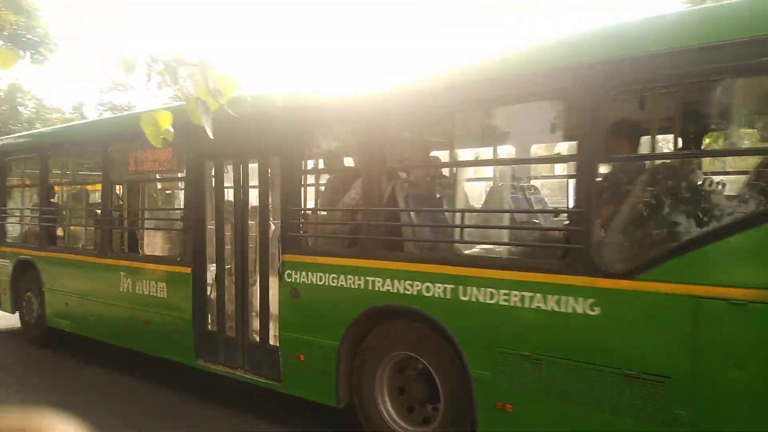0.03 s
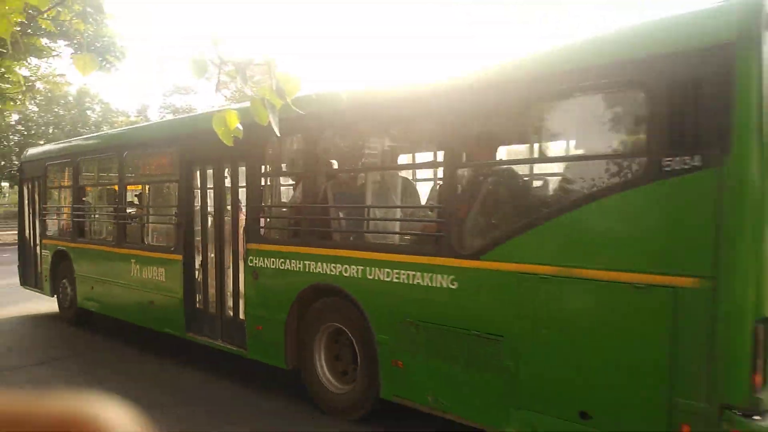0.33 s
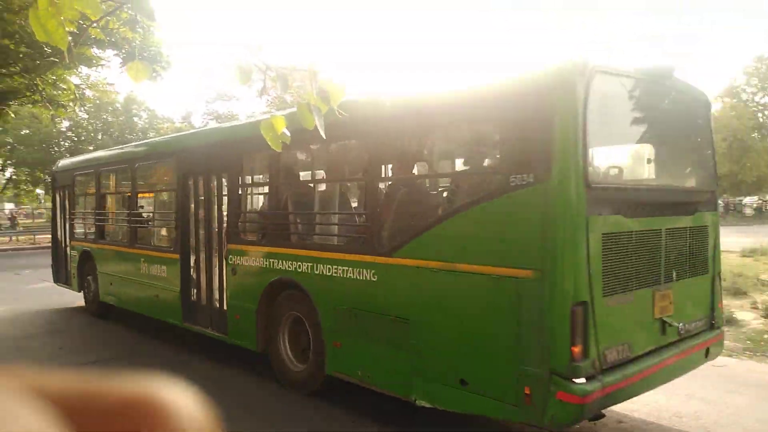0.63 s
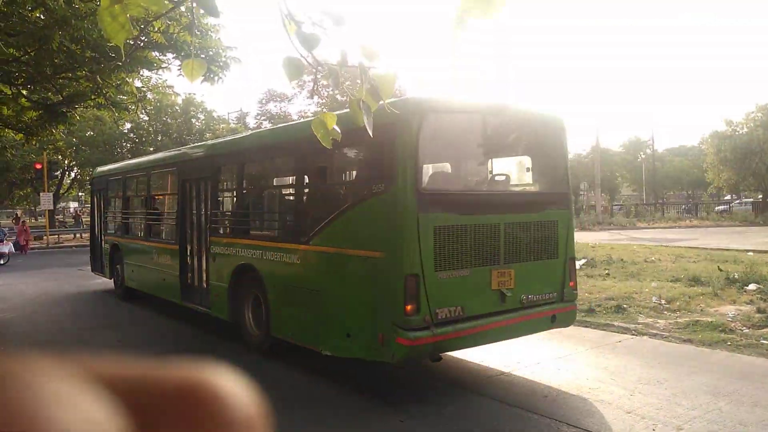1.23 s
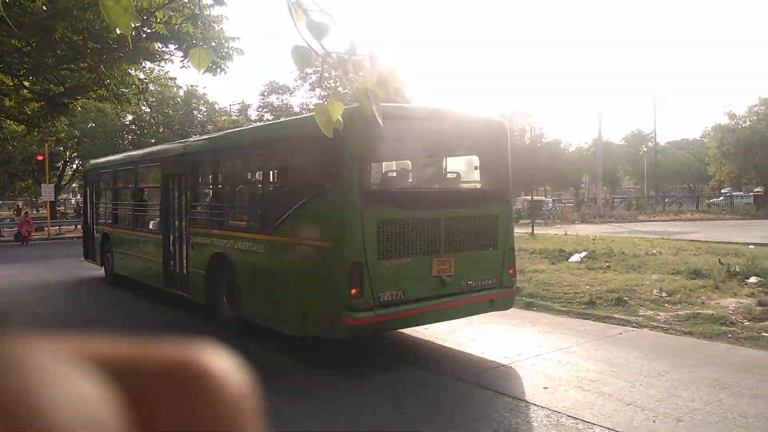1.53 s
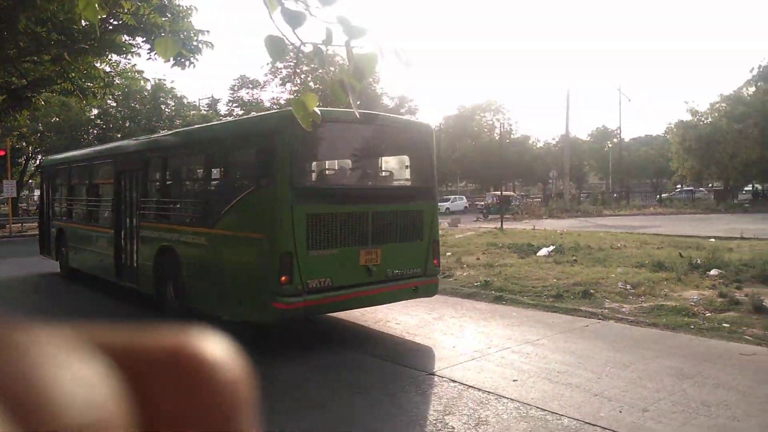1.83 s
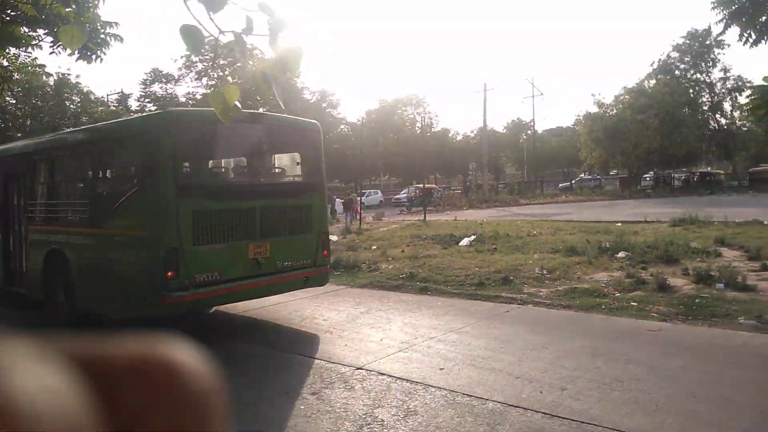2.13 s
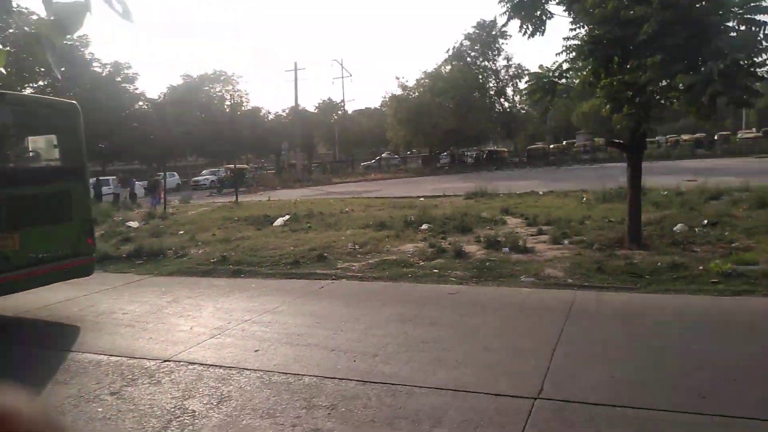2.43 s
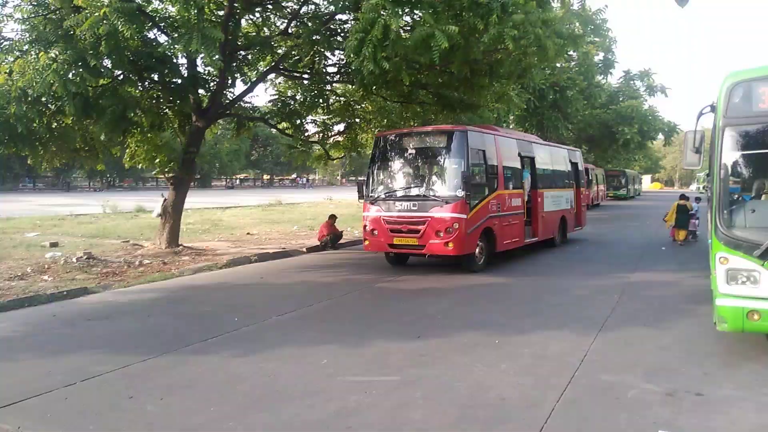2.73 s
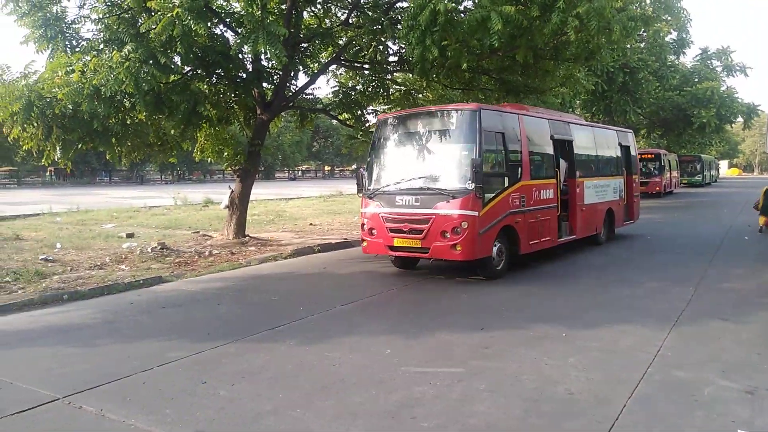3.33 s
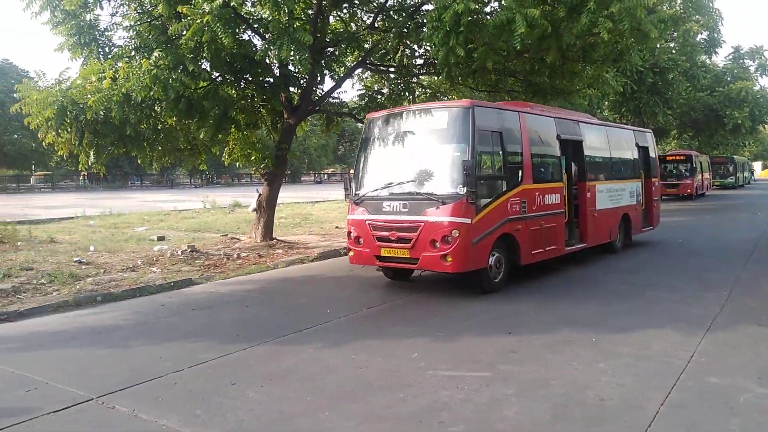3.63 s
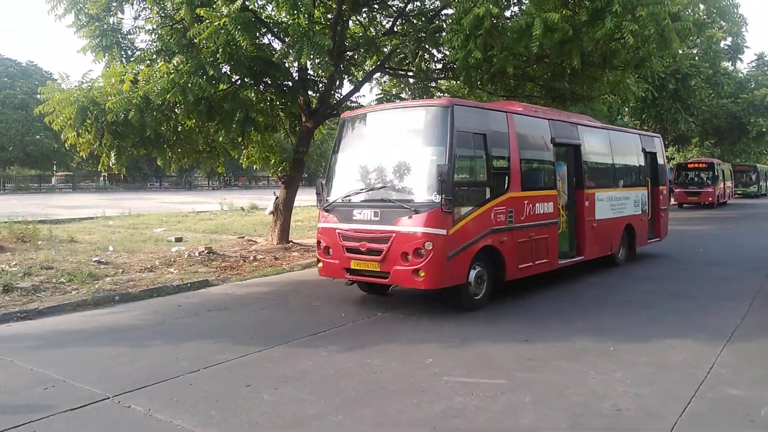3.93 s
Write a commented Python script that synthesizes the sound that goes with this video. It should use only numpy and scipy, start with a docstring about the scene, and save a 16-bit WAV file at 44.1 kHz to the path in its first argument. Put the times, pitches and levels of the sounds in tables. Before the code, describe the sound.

Diesel bus rumble on a road, heard close in wide stereo. The first bus slows past with high brake squeaks, puffs of air and a whining rear engine, cuts out briefly, and another approaches droning in low gear.

```python
"""A thin brake squeal rides on the rumble of a diesel bus slowing past at arm's length. The brake valve
spits air, a loose panel clacks, and the rear engine swings into view, whining and ringing its bay.
After a tenth of a second of silence a second bus approaches in low gear: exhaust and gears drone, and
each cylinder firing knocks the block. Both are heard through a close microphone pair with a stereo
widener."""
import sys
import numpy as np
from scipy import signal
from scipy.fft import rfft, irfft
from scipy.io import wavfile
from scipy.ndimage import uniform_filter1d

SR = 44100
rng = np.random.default_rng(int(sys.argv[2]) if len(sys.argv) > 2 else 0)


def file_out(sig):
    """Save sig as 16-bit WAV at sys.argv[1]."""
    # one column per channel
    cols = np.atleast_2d(sig).T
    # limit, then scale
    lim = np.clip(cols, -1, 1)
    pcm = np.round(lim * 32767).astype(np.int16)
    wavfile.write(sys.argv[1], SR, pcm)


N = 176400
T, HZ = np.arange(N) / SR, np.fft.rfftfreq(N, 1 / SR)

# Engine and road faders of each bus: t/s, low level/dB, middle level/dB, treble level/dB
LEAVING_LEVELS = [(0, -30, -29, -31.5), (.12, -34, -32.5, -32), (0.301, -34.5, -32.5, -33.5),
                  (.6, -34.5, -27, -31.5), (.9, -32.5, -26.5, -29.5), (1.15, -33, -27.5, -28),
                  (1.4, -27.5, -25.5, -25.5), (1.57, -30.5, -26.5, -27.5), (1.66, -26, -25.5, -25.5),
                  (1.73, -28.5, -24, -26.5), (1.8, -30, -22.5, -24.5), (2.03, -27, -25.5, -24),
                  (2.08, -31, -28, -28.5), (2.25, -31.5, -27.5, -27), (2.5, -26.5, -25.5, -24.5),
                  (2.78, -28.5, -26.3, -22.5), (2.84, -26.5, -31, -29)]
COMING_LEVELS = [(2.94, -29, -24, -26), (3.05, -24.5, -24.5, -25.5), (3.299, -27, -24.5, -24),
                 (3.42, -26.5, -23, -22.5), (3.48, -29.5, -28.5, -25.5), (3.7, -29, -25, -24),
                 (3.85, -25, -24.5, -22), (4, -28.5, -24, -23)]
# Tone colour of the first bus's flank and rear and the second's front: f/Hz, relative density/dB
FLANK_COLOUR = [(25, -18.5), (50, -2), (140, 3), (350, -1.5), (460, -8), (700, -14), (850, -11),
                (1150, -13.5), (1600, -15), (2000, -15), (2270, -3.5), (2550, -14), (2900, -13.5),
                (3600, -19), (5000, -24.5), (6500, -23), (9000, -25), (11500, -38.5), (14000, -41.5)]
REAR_COLOUR = [(25, -22), (48, 0), (80, 3.5), (180, 2.5), (300, -2.5), (450, -2), (570, -6), (800, -11),
               (1300, -9.5), (1900, -12), (2350, -7.5), (2850, -12), (3500, -12), (4400, -21), (6000, -22),
               (9000, -26), (11500, -40.5), (14000, -42)]
FRONT_COLOUR = [(25, -10), (48, -4.5), (120, 1), (300, 0.5), (500, -1.5), (630, -10), (800, -5),
                (1050, -8.5), (1400, -11), (2200, -5.5), (2650, -10), (3100, -3.5), (3900, -24.5),
                (4700, -16), (6900, -19.5), (8200, -26.5), (11500, -39.5), (14000, -43)]
# Stereo placement of each bus's roar: f/Hz, left minus right/dB
LEAVING_PAN = [(60, 2), (400, 1), (800, 6.5), (1200, -2), (1850, 3.5), (2300, 1), (2850, 8.5), (3800, 2),
               (4350, 3.5), (6000, 3.5), (10000, 8.5), (14000, 4)]
COMING_PAN = [(60, -3), (300, 1), (580, 3.5), (750, 3), (1150, -6), (1600, -2), (2300, 0), (2850, 21),
              (3400, -7), (4400, 1.5), (6100, 5.5), (10000, -0.5)]
# Left-right likeness of the roar: f/Hz, correlation
LIKENESS = [(40, -.1), (80, 0.35), (150, 0.61), (380, 0.84), (700, 0.28), (1050, 0.68), (1600, -0.2),
            (2200, 0.012), (2800, -0.31), (3500, 0.21), (4200, -0.15), (12000, -0.17)]
# How strongly each band of the roar throbs with the firings: f/Hz, weight
PULSING = [(60, 0.48), (500, 0.89), (2500, 0.93), (5000, 0.4), (12000, 0.15)]

# Falling exhaust hums of the slowing bus: start t/s, length/s, start f/Hz, end f/Hz, level/dB
EXHAUST_HUMS = [(.76, .4, 182, 169, -35), (1.5, .36, 408, 394, -35.5), (1.55, .5, 178, 168, -38),
                (.3, .35, 540, 528, -46)]
# Engine bay resonances: f/Hz, width/Hz, level/dB against the middle fader
BAY_MODES = [(452.7, 18, -20), (844, 28, -22.5), (1016, 21, -24.5), (1295, 110, -19), (1693, 70, -22),
             (2290, 81, -14)]
# Rough whine behind the grille: t/s, level/dB
GRILLE_WHINE = [(.9, -61), (1.15, -37.5), (1.45, -47), (1.62, -35.5), (1.75, -41.5), (1.9, -36),
                (2.1, -45.5), (2.3, -39), (2.5, -41.5), (2.78, -34)]
# Hits on a loose body panel: t/s, level/dB
CLACKS = [(0.2748, -28), (0.567, -37), (2.303, -26)]
# That panel's modes: f/Hz, width/Hz, relative level/dB
PANEL_MODES = [(335, 78, 3.5), (1200, 180, -7.5), (2430, 330, -0.5), (3200, 280, -4.5)]
# Spits of the brake valve: peak t/s, level/dB
SPITS = [(.279, -33), (.486, -38.5)]
# Colour of the escaping air: f/Hz, relative density/dB
SPIT_COLOUR = [(500, -17), (2500, -2), (6500, 4.5), (9500, -0.5), (14000, -18)]
# Main brake squeal: t/s, f/Hz, level/dB
SQUEAL = [(0, 7440, -32), (.04, 7360, -27.5), (.08, 7380, -27), (.125, 7330, -27.5), (.19, 7420, -52),
          (.31, 7330, -52), (.41, 7230, -74), (.76, 7290, -68), (.785, 7230, -41), (.825, 7230, -44),
          (.94, 7200, -30), (1, 7260, -47.5), (1.11, 7260, -44.5), (1.21, 7330, -36.5), (1.35, 7450, -71)]
# Higher brake squeaks: start t/s, length/s, start f/Hz, end f/Hz, level/dB
SQUEAKS = [(-.04, .13, 10050, 9820, -46), (.08, .1, 9950, 9820, -43), (.13, .05, 9380, 9280, -46),
           (.18, .05, 9180, 9080, -47), (.295, .045, 7850, 7700, -44), (.43, .06, 12850, 12750, -53),
           (.46, .09, 10080, 10220, -50), (1, .21, 12020, 12260, -48), (1.04, .14, 10300, 10780, -52),
           (1.35, .12, 9900, 10200, -48), (1.42, .06, 9150, 9100, -45), (2.25, .14, 10520, 10400, -45),
           (2.33, .27, 10380, 10180, -45), (2.52, .36, 10060, 10170, -47)]

# Exhaust and gear tones of the second bus: multiple of firing rate, level/dB
DRONE_ORDERS = [(1, -45.5), (2, -38.5), (3, -40.5), (8, -49.5), (10, -48.5), (16.9, -60), (21.1, -49),
                (22.6, -59), (31.8, -48.5)]
# Swells of its strongest gear tone: t/s, level/dB
GEAR_HUM = [(2.94, -36.5), (3.1, -35.5), (3.3, -40.5), (3.41, -33), (3.48, -35), (3.56, -35.5), (3.72, -44),
            (3.82, -32), (4, -52)]
# Its ringing engine covers: f/Hz, width/Hz, level/dB against the middle fader
COVER_MODES = [(950, 50, -22.5), (1060, 48, -21)]

# Widener crossfeed: f/Hz, share of the opposite channel subtracted
CROSSFEED = [(300, 0.029), (900, 0.55), (2100, 0.57), (4300, 0.57), (6400, 0.2), (11000, 0.068)]

LEAVING_FIRING_HZ, COMING_FIRING_HZ = 32.85, 50.17
REAR_FROM_S, REAR_BY_S = 0.74, 1.4   # the flank gives way to the engine grille
FADE_FROM_S, FADE_S, COMING_FROM_S = 2.833, 0.019, 2.938


def from_db(db):
    """Decibels to gain."""
    return 10 ** (np.asarray(db) / 20)


def rms_one(x):
    """Scale to unit rms."""
    return x / np.sqrt(np.mean(x ** 2) + 1e-20)


def in_time(rows):
    """Each column of an automation curve at every sample."""
    s, *columns = np.transpose(rows)
    return [np.interp(T, s, c) for c in columns]


def at_hz(points, hz):
    """Read a table on a log-frequency axis."""
    f, value = np.transpose(points)
    return np.interp(np.log(hz + 1), np.log(f), value)


def panned(pan_db):
    """Constant-power left and right gains; positive leans left."""
    gains = from_db(np.array([[.5], [-.5]]) * pan_db)
    return gains / np.sqrt(np.mean(gains ** 2, axis=0))


def drift(rate_hz):
    """Smooth random modulation, unit rms."""
    return rms_one(irfft(rfft(rng.standard_normal(N)) / (1 + (HZ / rate_hz) ** 2) ** 2, N))


def resonate(x, hz, width_hz):
    """One resonance, unit rms."""
    r = np.exp(-np.pi * width_hz / SR)
    return rms_one(signal.lfilter([1, 0, -1], [1, -2 * r * np.cos(2 * np.pi * hz / SR), r * r], x))


def muffled(x):
    """Heavy panels radiate little treble."""
    return signal.sosfilt(signal.butter(4, 3600, fs=SR, output="sos"), x)


def tone(hz, waver_hz, waver_rate, flutter_db):
    """A wavering, fluttering tone, unit rms."""
    phase = 2 * np.pi * np.cumsum(hz + waver_hz * drift(waver_rate)) / SR
    return rms_one(np.sin(phase) * from_db(flutter_db * drift(48)))


def glides(rows, **wobble):
    """Gliding tones that swell and fade."""
    out = 0
    for start, length, from_hz, to_hz, db in rows:
        along = np.clip((T - start) / length, 0, 1)
        swell = from_db(db) * abs(np.sin(np.pi * along))
        out += swell * tone(from_hz + (to_hz - from_hz) * along, **wobble)
    return out


def reflections(count, from_s=.008, to_s=.07, echo_db=-10):
    """Frequency response of the direct sound plus short echoes off road, panels and trees."""
    lag, sign = rng.random((count, 2)).T
    echoes = np.zeros(N)
    echoes[((from_s + lag * (to_s - from_s)) * SR).astype(int)] = np.sign(sign - .5)
    return 1 + from_db(echo_db) * rfft(echoes) / np.sqrt(count)


def firings(rate_hz, decay_s, uneven_db=1.2):
    """The engine's beat: a dying burst of its own strength at each cylinder firing; unit rms."""
    cycles = np.cumsum(rate_hz * (1 + 0.01565 * drift(5.3))) / SR
    strength = from_db(uneven_db * rng.standard_normal(size=1000))
    bursts = strength[cycles.astype(int)] * np.exp(-(cycles % 1) / rate_hz / decay_s)
    return rms_one(uniform_filter1d(bursts, size=60))


def roar(spectrum, pan, levels, beat, pulsed, flicker_db):
    """The bed: engine and tyre noise in flickering octave bands, partly throbbing with the firings."""
    low_db, middle_db, treble_db = in_time(levels)
    mid, side = rfft(rng.standard_normal((2, N)))
    alike = at_hz(LIKENESS, HZ)
    stereo = np.sqrt(1 + alike) * mid + np.sqrt(1 - alike) * side * [[1], [-1]]
    colour = from_db(at_hz(spectrum, HZ)) * HZ ** 6 / (HZ ** 6 + 31 ** 6)   # low cut at 31 Hz
    noise = colour * reflections(count=12) * panned(at_hz(pan, HZ)) * stereo
    noise /= np.std(irfft(noise, N))
    octave = np.log2(np.clip(HZ, 50, 12800) / 50)
    shared_flicker, out = drift(5.5), 0
    for k in range(9):
        band = irfft(noise * np.maximum(1 - abs(octave - k), 0), N)
        low, treble = np.clip([2 - k / 2, k / 2 - 2], 0, 1)
        level_db = low * low_db + (1 - low - treble) * middle_db + treble * treble_db
        share = pulsed * at_hz(PULSING, 50 * 2 ** k)
        gain = from_db(level_db + flicker_db * (.5 * shared_flicker + drift(19)))
        out += band * gain * np.sqrt(1 - share + share * beat ** 2)
    return out


def panel_clacks(decay_s=0.014):
    """Each clack is a brief rattle of contacts into the modes of a loose body panel."""
    force = sum(from_db(db) * (T > s) * np.exp(-np.maximum(T - s, 0) / decay_s) for s, db in CLACKS)
    modes = sum(from_db(db) * resonate(rng.standard_normal(N), hz, width)
                for hz, width, db in PANEL_MODES)
    return force * rms_one(muffled(modes)) * panned(3.5)


def valve_spits(rise_s=0.004, decay_s=0.017):
    """The brake valve lets out short, bright puffs of air."""
    envelope = sum(from_db(db) * np.clip((T - s) / rise_s + 1, 0, 1)
                   * np.exp(-np.maximum(T - s, 0) / decay_s) for s, db in SPITS)
    air = irfft(rfft(rng.standard_normal((2, N))) * from_db(at_hz(SPIT_COLOUR, HZ)), N)
    return envelope * rms_one(air) * panned(5)


def engine_bay(beat):
    """Noise pulsing with the firings rings the rear engine bay."""
    _, middle_db, _ = in_time(LEAVING_LEVELS)
    air = beat * (rng.standard_normal((2, N)) + rng.standard_normal(N))
    return sum(from_db(middle_db + db) * resonate(air, hz, width) for hz, width, db in BAY_MODES)


def diesel_knock(beat):
    """Each firing knocks the second engine's block and rings its covers."""
    _, middle_db, treble_db = in_time(COMING_LEVELS)
    block = from_db(treble_db - 15) * resonate(beat * rng.standard_normal(N), hz=3200, width_hz=460)
    knock = signal.sosfilt(signal.butter(2, [2000, 4000], "band", fs=SR, output="sos"), block)
    covers = sum(from_db(middle_db + db) * resonate(beat * rng.standard_normal(N), hz, width)
                 for hz, width, db in COVER_MODES)
    return muffled(covers) + knock * panned(13)


def low_gear_drone(gear_order=5.35):
    """Exhaust tones, gear tones and a swelling gear hum all follow the engine speed."""
    firing_hz = COMING_FIRING_HZ * (1 + 0.00414 * drift(3.26))
    drone = sum(from_db(db) * tone(order * firing_hz, waver_hz=1.37, waver_rate=19.8, flutter_db=1)
                for order, db in DRONE_ORDERS)
    hum = tone(gear_order * firing_hz, waver_hz=3.1, waver_rate=33, flutter_db=2)
    return (drone + from_db(in_time(GEAR_HUM)[0]) * hum) * panned(6.5)


def brake_squeal(split_hz=50, upper_db=-1):
    """The linings sing on a close, beating pair of modes and squeak on higher ones."""
    hz, db = in_time(SQUEAL)
    lower, upper = (tone(f, waver_hz=36, waver_rate=220, flutter_db=2.5) for f in (hz, hz + split_hz))
    squeal = from_db(db) * rms_one(lower + from_db(upper_db) * upper)
    squeaks = glides(SQUEAKS, waver_hz=120, waver_rate=450, flutter_db=3.5)
    return (squeal + squeaks) * panned(10)


def leaving_bus():
    """The flank crossfades to the engine grille with its whine and ringing bay, over falling hums."""
    beat = firings(LEAVING_FIRING_HZ, decay_s=0.013)
    rear_share = np.clip((T - REAR_FROM_S) / (REAR_BY_S - REAR_FROM_S), 0, 1)
    flank = roar(FLANK_COLOUR, LEAVING_PAN, LEAVING_LEVELS, beat, pulsed=0.083, flicker_db=1.26)
    rear = roar(REAR_COLOUR, LEAVING_PAN, LEAVING_LEVELS, beat, pulsed=0.1, flicker_db=1.5)
    bed = np.sqrt(1 - rear_share) * flank + np.sqrt(rear_share) * rear
    bay = muffled(rear_share * engine_bay(beat))
    whine = from_db(in_time(GRILLE_WHINE)[0]) * tone(623.5, waver_hz=15.14, waver_rate=53, flutter_db=4.5)
    hums = glides(EXHAUST_HUMS, waver_hz=3, waver_rate=25, flutter_db=2)
    return bed + bay + whine * panned(9) + hums


def coming_bus():
    """The second bus head-on: roar and knock share one beat, over the drone."""
    beat = firings(COMING_FIRING_HZ, decay_s=0.0075)
    bed = roar(FRONT_COLOUR, COMING_PAN, COMING_LEVELS, beat, pulsed=0.09, flicker_db=1.05)
    return bed + diesel_knock(beat) + low_gear_drone()


def scene():
    """One bus fades fast into a brief silence, then the other cuts in."""
    first_bus = leaving_bus() + brake_squeal() + valve_spits() + panel_clacks()
    fade_out = np.clip(1 - (T - FADE_FROM_S) / FADE_S, 0, 1)
    return fade_out * first_bus + (T > COMING_FROM_S) * coming_bus()


def record(dry):
    """The widener subtracts a late copy of the opposite channel; the top is cut steeply."""
    delay_s, cutoff_hz = 0.0004696, 14300
    both = rfft(dry)
    cross = at_hz(CROSSFEED, HZ) * np.exp(-2j * np.pi * HZ * delay_s)
    high_cut = 1 / np.sqrt(1 + (HZ / cutoff_hz) ** 300)
    return irfft((both - cross * both[::-1]) * high_cut, N)


dry = scene()
out = record(dry)
file_out(out)
```